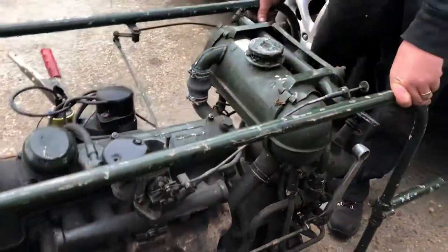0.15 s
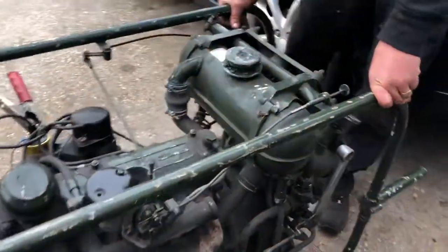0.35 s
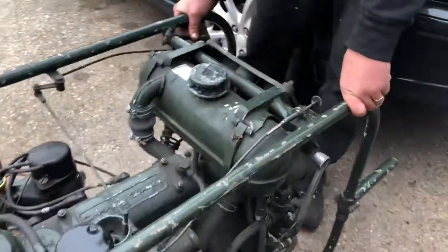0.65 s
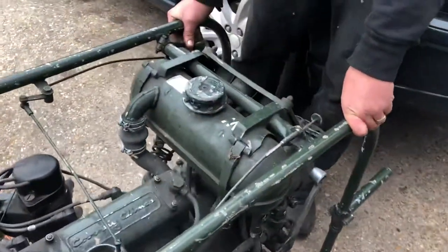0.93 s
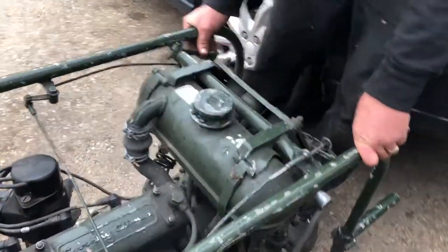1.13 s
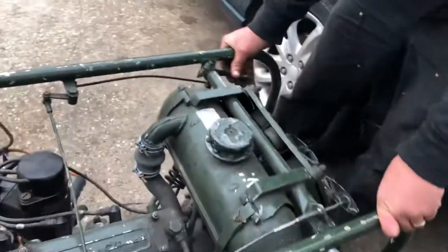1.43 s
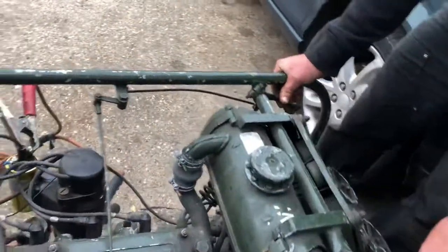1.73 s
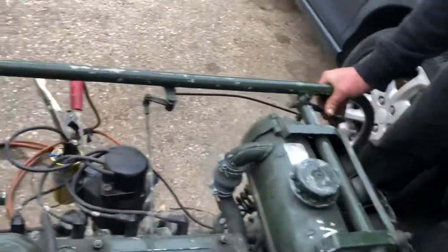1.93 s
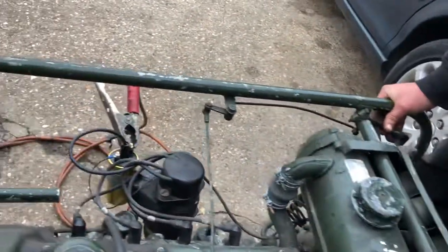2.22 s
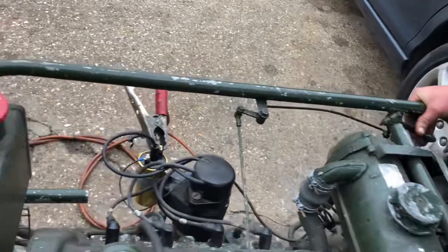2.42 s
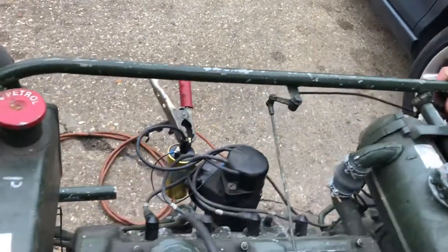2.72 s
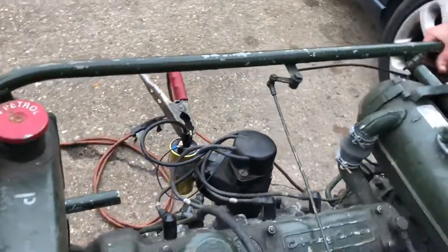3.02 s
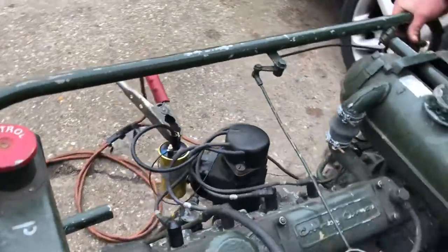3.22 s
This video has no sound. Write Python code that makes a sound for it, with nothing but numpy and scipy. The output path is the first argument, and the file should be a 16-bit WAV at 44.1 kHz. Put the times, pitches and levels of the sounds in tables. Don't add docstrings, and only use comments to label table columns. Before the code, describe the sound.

A portable petrol engine runs steadily close by, booming exhaust, occasional misfires, clatter and airy hiss.

```python
import sys
import numpy as np
from scipy import signal
from scipy.fft import rfft, irfft
from scipy.io import wavfile

SR = 44100
rng = np.random.default_rng(int(sys.argv[2]) if len(sys.argv) > 2 else 0)


def ratio_of_db(decibels):
    return 10 ** (np.asarray(decibels, float) / 20)


def to_wav(s):
    ch = np.atleast_2d(s).T
    pcm = np.round(np.clip(ch, -1, 1) * 32767)
    wavfile.write(sys.argv[1], SR, pcm.astype(np.int16))


N = 148176

# t/s, firing rate/Hz
FIRING_RATE = [(0.0, 55.12), (0.2, 60.18), (0.5, 57.27), (0.75, 57.43), (1.0, 59.32), (1.2, 59.77),
               (1.32, 61.46), (1.5, 59.23), (1.62, 60.78), (1.9, 61.5), (2.05, 58.86), (2.25, 56.46),
               (2.42, 58.73), (2.6, 60.64), (2.8, 58.37), (2.95, 57.5), (3.15, 57.2), (3.36, 56.5)]
# t/s, place/[0 exhaust end, 1 far end], intake closeness/[0-1], valve cover view/[0-1]
CAMERA_PATH = [
    (0, 0.11, 0, 0.7),
    (.4, 0.26, 0, 0.53),
    (.9, 0.48, 0.5, 0.42),
    (1.4, 0.68, .8, 0.17),
    (1.9, 0.78, 1, 0.22),
    (2.4, 0.83, 0.9, 0.65),
    (2.9, 0.88, 0.5, 0.69),
    (3.36, 0.91, 0, 0.83),
]
# t/s, share of blow lost/[above 1 the pipe sucks back], pop level of next firing/dB
MISSED_CHARGES = [(.162, 0.6, 1), (.367, 0.51, 1), (.85, 0.31, .7), (.969, .45, 1), (1.238, .35, .7),
                  (1.387, 0.63, 0.4), (1.519, 0.59, 1), (1.553, 0.54, .7), (1.849, 0.56, 0.83),
                  (1.968, .5, 0.56), (2.047, 0.77, 0.57), (2.251, 0.27, .7), (2.594, 1.48, -1.5),
                  (2.677, 1.46, -1.7), (2.728, 1.42, -1.7), (3.084, 0.35, 0.9)]
CYLINDER_LEVELS_DB = [-2.5, -0.03, 0.85, 2.5]
VALVE_LEVELS_DB = [0.29, 0.58, 0.27, -0.98]
# f/Hz, width/Hz, polarity/[+-1]
PIPE_MODES = [(59, 24, -1), (116, 46, 1), (178, 42, 1), (243, 28, 1), (297, 30, 1), (348, 34, 1),
              (420, 40, 1), (530, 50, 1)]
# level at exhaust end/dB, level at far end/dB
PIPE_LEVELS_DB = [(-23, -23), (-17, -19.5), (-14.5, -26.5), (-49.5, -21.5), (-38.5, -22), (-39, -29.5),
                  (-50.5, -37), (-32, -57)]
# f/Hz, width/Hz, level with cover hidden/dB, level in view/dB
CASING_MODES = [(821, 80, -39, -37.5), (1248, 100, -34, -44), (1490, 140, -44.5, -42), (1843, 35, -43, -47),
                (2520, 150, -72, -30.5), (2870, 120, -48.5, -37.5), (3832, 270, -52, -38),
                (3960, 130, -42, -36), (4970, 120, -39, -41.5), (5210, 86, -39, -42), (6650, 710, -41, -67),
                (8460, 110, -48, -68)]
# f/Hz, level/dB
ROAR_SPECTRUM = [(220, 6), (380, -27), (591, 3), (1270, 4.5), (2070, -0.5), (2360, 2.5), (3600, -8),
                 (4680, -30), (7920, -120)]
# f/Hz, width/Hz, level away from intake/dB, level close to it/dB
INTAKE_MODES = [(3700, 2100, -42, -60), (5453, 1200, -39, -40.5), (6800, 1530, -40, -37),
                (8723, 1200, -41.5, -41.5), (9990, 1300, -40.5, -39), (11320, 2000, -41.5, -43.5),
                (14540, 3000, -36, -32), (14500, 500, -67, -48.5)]

START_TURN = -0.28
UNEVEN_DB, JITTER_S = 0.3, 0.00035
LATE_BURN_S, LATE_BURN_SHARE = 0.024, 0.56
VALVE_PHASE, VALVE_RISE, VALVE_FALL = 0.476, 0.056, 0.54
KNOCK_SPREAD_DB = 1.13
TICKS_PER_S, TICK_SPREAD_DB, PART_SPREAD_DB = 1300, 3, 3.5
ROAR_DB, ROAR_GATE_SHARE = -33.5, 0.58
WASH_DB, WASH_HZ, WASH_WIDTH_HZ = -30.5, 260, 240
HISS_GATE_SHARE, FLUTTER_DB = 0.35, 1
ROCK_DB, ROCK_HZ, ROCK_WIDTH_HZ = -36, 76.4, 28
MAX_FIRINGS = 400


def evened(x):
    return x / np.sqrt(np.mean(x ** 2) + 1e-20)


def curve(table, column=1):
    rows = np.array(table)
    return np.interp(np.arange(N) / SR, rows[:, 0], rows[:, column])


def fade_db(from_db, to_db, position):
    return ratio_of_db(from_db + (to_db - from_db) * position)


def ring(x, hz, width_hz):
    radius = np.exp(-np.pi * width_hz / SR)
    return signal.lfilter([0, 1], [1, -2 * radius * np.cos(2 * np.pi * hz / SR), radius * radius], x)


def swell(x, hz, width_hz):
    return ring(ring(x, hz, width_hz), hz, width_hz)


def drift(rate_hz):
    lowpass = signal.butter(2, rate_hz, fs=SR, output="sos")
    return evened(signal.sosfilt(lowpass, rng.standard_normal(N)))


def firings():
    turns = START_TURN + np.cumsum(curve(FIRING_RATE)) / SR
    at = np.nonzero(np.diff(np.floor(turns)))[0]
    count = len(at)
    luck = rng.standard_normal((count, 2))
    strength = ratio_of_db(np.resize(CYLINDER_LEVELS_DB, count) + UNEVEN_DB * luck[:, 0])
    late = np.zeros(count)
    strength[0] *= 1.8
    for t_s, lost, pop_db in MISSED_CHARGES:
        k = np.argmin(abs(at - t_s * SR))
        strength[k] *= 1 - lost
        strength[k + 1] *= ratio_of_db(pop_db)
        late[k] = LATE_BURN_SHARE * lost ** 2
    blow_at = at + JITTER_S * SR * luck[:, 1]
    late_at = at + LATE_BURN_S * SR
    all_at = np.clip(np.concatenate([blow_at, late_at]), 0, N - 1).astype(int)
    return turns, all_at, np.concatenate([strength, late])


def valve_gate(turns):
    phase = (turns - VALVE_PHASE) % 1
    number = np.floor(turns - VALVE_PHASE).astype(int) + 1
    force_db = np.resize(VALVE_LEVELS_DB, MAX_FIRINGS) + KNOCK_SPREAD_DB * rng.standard_normal(MAX_FIRINGS)
    shape = (1 - np.exp(-phase / VALVE_RISE)) * np.exp(-phase / VALVE_FALL)
    return evened(ratio_of_db(force_db)[number] * shape), number


def low_wash():
    noise = np.diff(rng.standard_normal(N + 1))
    return ratio_of_db(WASH_DB) * evened(ring(noise, WASH_HZ, WASH_WIDTH_HZ))


def roar(gate):
    hz = np.fft.rfftfreq(N, 1 / SR) + 1
    f, level_db = np.transpose(ROAR_SPECTRUM)
    colour_db = np.interp(np.log(hz - 1 + 1), np.log(f), level_db)
    colour_db -= 51 * np.maximum(np.log2(f[0] / hz), 0)
    colour_db -= 30 * np.maximum(np.log2(hz / f[-1]), 0)
    puffs = rng.standard_normal(N) * (1 - ROAR_GATE_SHARE + ROAR_GATE_SHARE * gate)
    return ratio_of_db(ROAR_DB) * evened(irfft(rfft(puffs) * ratio_of_db(colour_db), N))


def intake(gate):
    air = rng.standard_normal(N) * (1 - HISS_GATE_SHARE + HISS_GATE_SHARE * gate)
    air *= ratio_of_db(FLUTTER_DB * drift(40))
    near = curve(CAMERA_PATH, column=2)
    out = np.zeros(N)
    for k, (hz, width_hz, away_db, close_db) in enumerate(INTAKE_MODES):
        gain = fade_db(away_db, close_db, near) * ratio_of_db(0.81 * drift(18))
        out += (-1) ** k * gain * evened(swell(air, hz, width_hz))
    return out


def rocking(at, strength):
    half = len(at) // 2
    jolts = np.zeros(N)
    jolts[at[:half]] = strength[half:] ** 2
    return ratio_of_db(ROCK_DB) * evened(swell(jolts, ROCK_HZ, ROCK_WIDTH_HZ))


def clatter(gate, number):
    view = curve(CAMERA_PATH, column=3)
    out = np.zeros(N)
    for hz, width_hz, hidden_db, seen_db in CASING_MODES:
        struck = rng.random(N) < TICKS_PER_S / SR
        size = np.minimum(rng.exponential(1, N), 4)
        sign = rng.choice([-1., 1.], N)
        part_db = PART_SPREAD_DB * rng.standard_normal(MAX_FIRINGS)[number]
        ticks = gate * sign * ratio_of_db(part_db + TICK_SPREAD_DB * size) * struck
        gain = fade_db(hidden_db, seen_db, view) * ratio_of_db(0.4 * drift(12))
        out += gain * evened(ring(np.diff(ticks, prepend=0), hz, width_hz))
    return out


def exhaust(at, strength):
    blows = np.zeros(N)
    blows[at] = strength
    place = curve(CAMERA_PATH)
    out = np.zeros(N)
    for (hz, width_hz, sign), (exhaust_end_db, far_end_db) in zip(PIPE_MODES, PIPE_LEVELS_DB):
        out += sign * fade_db(exhaust_end_db, far_end_db, place) * evened(swell(blows, hz, width_hz))
    return out


def scene():
    turns, at, strength = firings()
    gate, number = valve_gate(turns)
    gas = low_wash() + roar(gate) + intake(gate)
    metal = rocking(at, strength) + clatter(gate, number)
    return (gas + metal + exhaust(at, strength))[None]


def top_cut(x):
    return signal.sosfilt(signal.butter(12, 16600, fs=SR, output="sos"), x)


def record(dry):
    mix = signal.sosfilt(signal.butter(2, 36., "high", fs=SR, output="sos"), dry)
    mix = signal.sosfiltfilt(signal.butter(2, 33., "high", fs=SR, output="sos"), mix)
    treble_cut = signal.firwin(901, 15760, window=("kaiser", 9), fs=SR)
    mix = signal.oaconvolve(mix, treble_cut[None], "same")
    return top_cut(mix)


dry = scene()
out = record(dry)
to_wav(out)
```